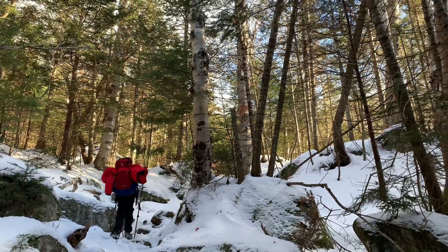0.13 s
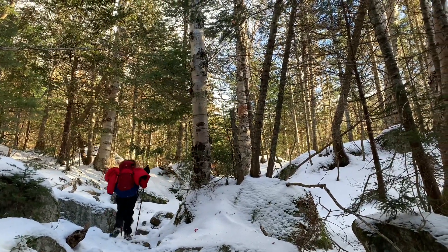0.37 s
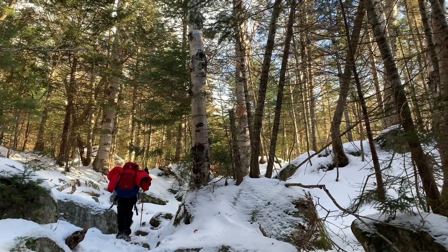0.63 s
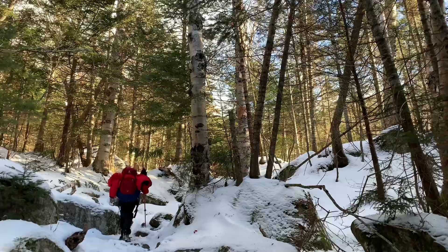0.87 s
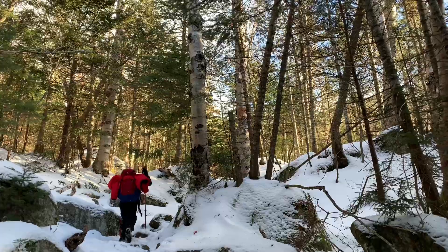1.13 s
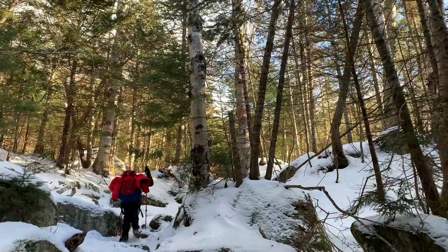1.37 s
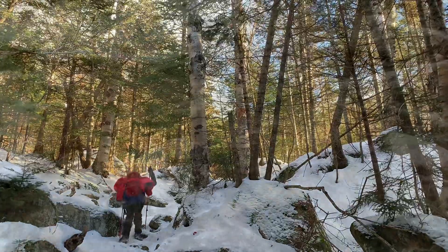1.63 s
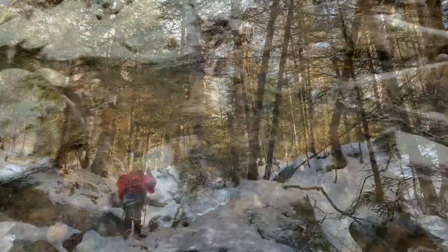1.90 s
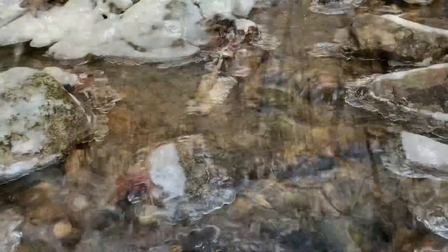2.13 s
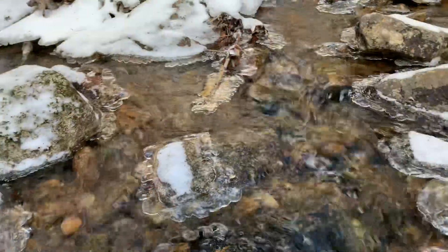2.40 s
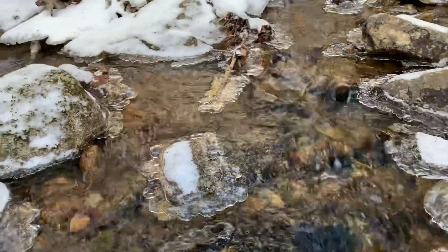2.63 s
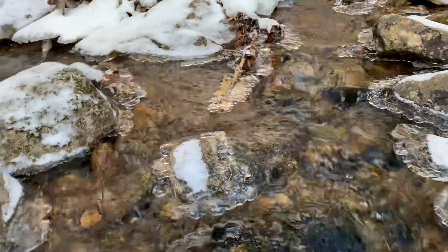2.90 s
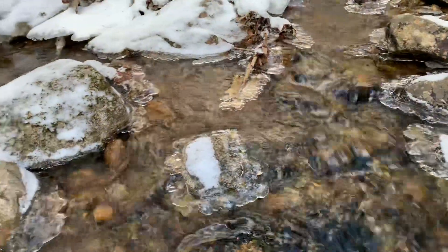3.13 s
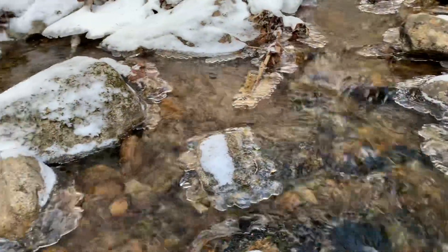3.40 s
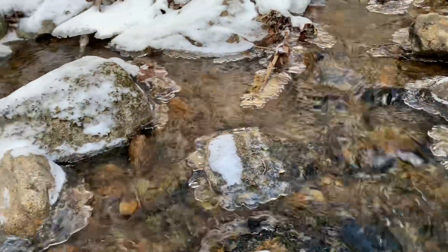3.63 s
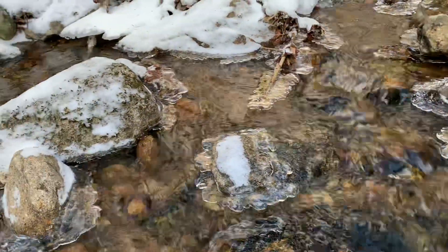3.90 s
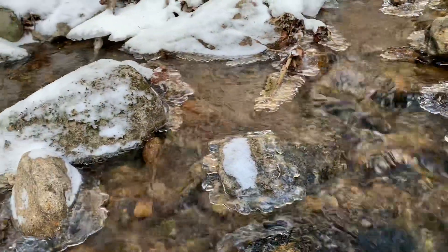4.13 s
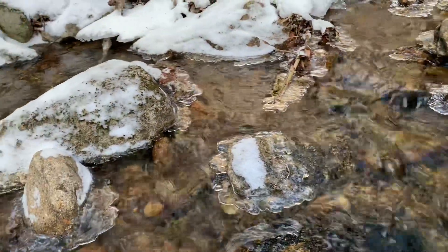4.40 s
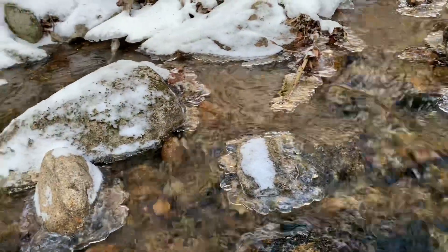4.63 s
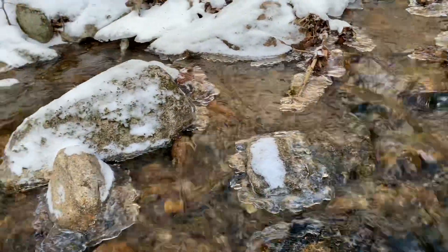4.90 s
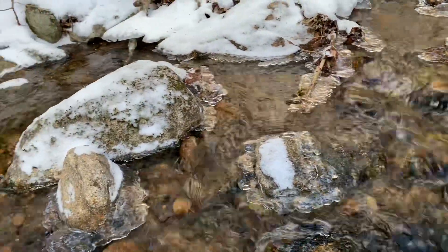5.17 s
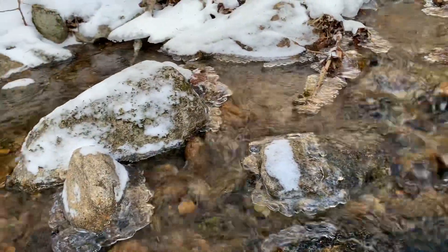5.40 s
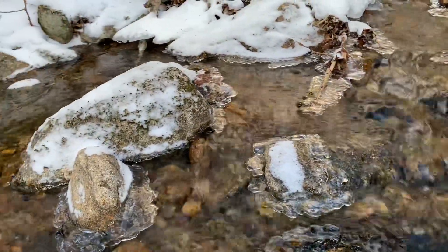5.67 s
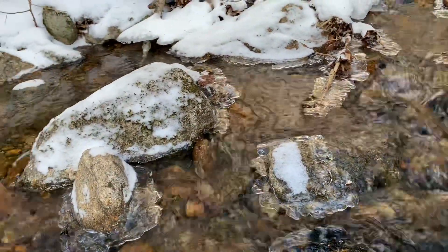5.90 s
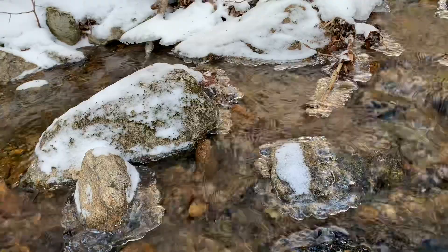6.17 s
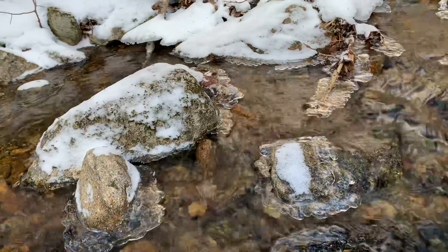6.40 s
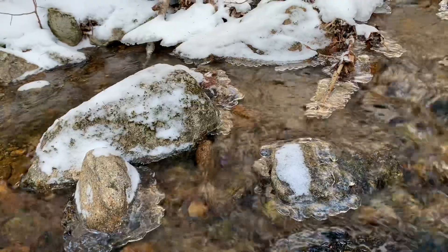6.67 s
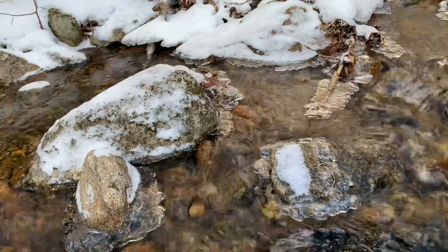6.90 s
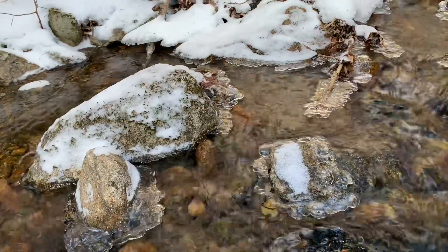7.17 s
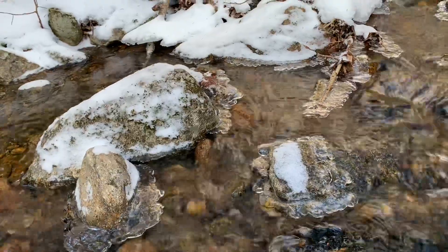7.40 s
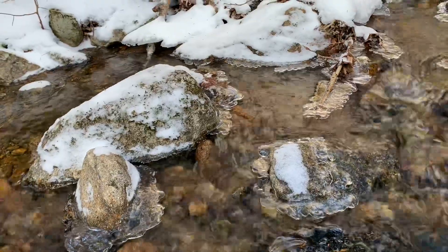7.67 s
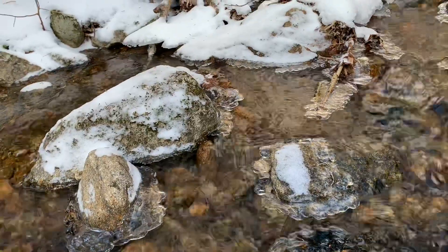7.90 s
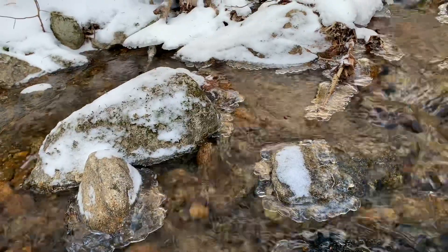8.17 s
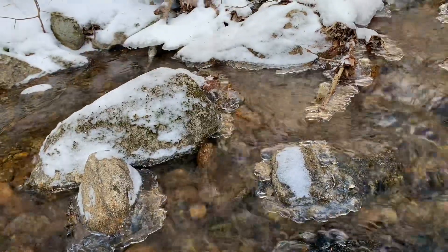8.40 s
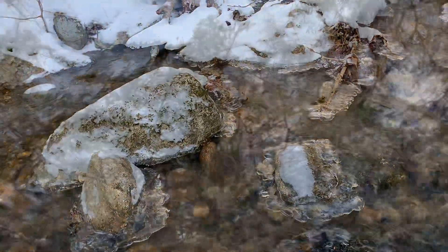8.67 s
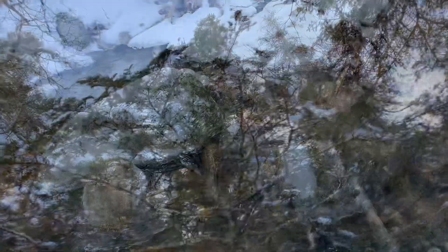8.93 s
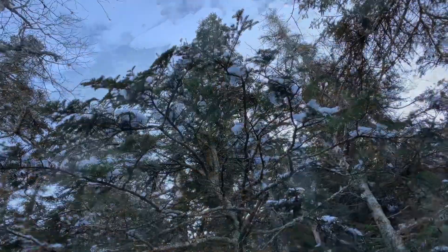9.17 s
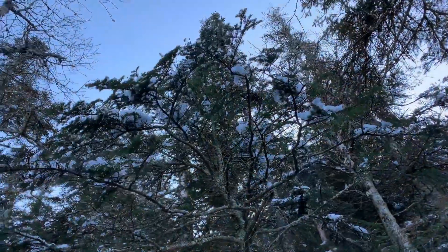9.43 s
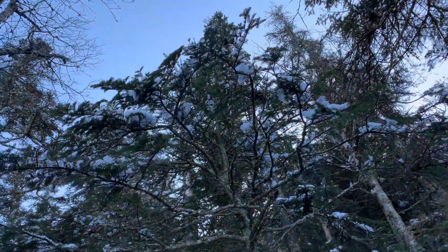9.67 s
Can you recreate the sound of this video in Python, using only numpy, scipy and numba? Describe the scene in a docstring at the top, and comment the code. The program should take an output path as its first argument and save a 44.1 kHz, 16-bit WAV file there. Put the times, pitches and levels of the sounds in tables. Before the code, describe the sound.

A walker softly crunches through snow in a quiet wood, a bubbling stream swells up close, then wind, tree rustle and knocking footsteps end it.

```python
"""In the faint hush of a wood a walker crunches and swishes through snow, packed in noise and breaking grains.
From 1.4 s a shallow brook fades in close by: rushing noise, a hollow hum and thousands of damped sines that
gurgle and fizz; single bubbles pop as rising sines and bursting drops spit as short hisses.
From 8.2 s it fades out under low wind rumble and rustling trees, with two more steps and knocks at the end.
Two microphone ports a few centimetres apart hear it all, with a phase gap and partly unlike noise."""
import sys
import numpy as np
from scipy import signal
from scipy.fft import rfft, irfft, next_fast_len
from scipy.io import wavfile
from scipy.ndimage import map_coordinates
from numba import njit

SR = 44100
rng = np.random.default_rng(int(sys.argv[2]) if len(sys.argv) > 2 else 0)


def attenuation_scalar(level_db):
    """Turn a level in dB into a linear amplitude multiplier (20 dB per decade)."""
    decades = np.asarray(level_db, float) / 20
    return 10 ** decades


def digitize_waveform(pressure):
    """Quantize a signal to 16-bit integers and store it at the path in sys.argv[1].

    Rows of a 2-D input are taken as channels; values are limited to [-1, 1].
    """
    field = np.atleast_2d(pressure).T
    bounded = np.clip(field, -1, 1)
    quanta = np.round(bounded * 32767).astype(np.int16)
    wavfile.write(sys.argv[1], SR, quanta)


N = 432114  # samples, 9.8 s


def unit(x):
    """Scaled to rms 1."""
    return x / np.sqrt(np.mean(x ** 2) + 1e-20)


def along(points, hz):
    """Interpolates (Hz, value) points on a log frequency axis."""
    f, v = np.transpose(points)
    return np.interp(np.log(hz + 1), np.log(f + 1), v)


def wobble(rate):
    """A smooth random curve with rate knots a second."""
    knots = rng.standard_normal(int(N * rate / SR) + 4)
    return map_coordinates(knots, [np.arange(N) * rate / SR])


def fade(start, end):
    """A gain that climbs from 0 to 1 between two times in seconds."""
    return np.clip((np.arange(N) / SR - start) / (end - start), 0, 1)


def bell(s, rise, fall):
    """A smooth swell to 1 at time s; rise and fall are the seconds to 1/e on either side."""
    t = np.arange(N) / SR - s
    return np.exp(-(t / np.where(t < 0, rise, fall)) ** 2)


def filtered(x, response):
    """x times a complex response of frequency."""
    m = next_fast_len(N + 8192)
    return irfft(rfft(x, m) * response(np.fft.rfftfreq(m, 1 / SR)), m)[..., :N]


def noise(colour):
    """Two unrelated coloured noises of rms 1."""
    white = rng.standard_normal((2, N))
    return unit(filtered(white, lambda hz: attenuation_scalar(along(colour, hz))))


@njit
def add(out, s, hz, cycles, gain, rise, swell, sr):
    """Damped sines that swell softly while their pitch glides by rise; cycles are counted per decay to 1/e."""
    for k in range(len(s)):
        life = cycles[k] / hz[k] * sr
        start = int(s[k] * sr)
        for i in range(min(int(5 * life), len(out) - start)):
            u = i / life
            turn = 2 * np.pi * cycles[k] * (u + rise[k] * u * u / 2)
            out[start + i] += gain[k] * np.exp(-u) * (1 - np.exp(-u / swell)) * np.sin(turn)


def rings(s, hz, cycles, gain, rise, swell):
    """A track of damped sines."""
    out = np.zeros(N)
    add(out, s, hz, cycles + 0 * s, gain, rise + 0 * s, swell, SR)
    return out


def froth(colour, count, cycles, spread_db, rise, surge):
    """Countless small rings, born more densely in each surge, some stronger, longer or gliding further."""
    when, size, luck, life, glide = rng.random((count, 5)).T
    births = np.cumsum(surge)
    s = np.searchsorted(births, when * births[-1]) / SR
    hz = colour[0][0] * (colour[-1][0] / colour[0][0]) ** size
    gain = attenuation_scalar(along(colour, hz) - spread_db * np.log(luck + 0.0092)) * hz / 1000
    return rings(s, hz, cycles * (0.56 + life), gain, 2 * glide * rise, swell=0.2)


def froth_pair(*args, **settings):
    """Two unrelated froths of rms 1 that share their surges."""
    return unit(np.array([froth(*args, **settings) for _ in range(2)]))


# Phase gap between the two ports. Each row: frequency in Hz, lead of the left port in radians.
PORT_LEAD = [(0, 0), (500, .2), (1000, .9), (1700, 2.5), (2900, 3.2), (4200, 6.2), (6100, 6.28),
             (16000, -6.55)]


def lead(hz):
    """Half of the phase gap on each port."""
    return np.exp(np.multiply.outer([.5j, -.5j], np.interp(hz, *np.transpose(PORT_LEAD))))


# Likeness of the ports in fully diffuse sound. Each row: frequency in Hz, share of power that both hear.
PORT_SHARED = [(60, 0.77), (200, 0.96), (500, 0.82), (1000, 0.73), (2000, 0.19), (5500, 0.03), (7000, 1),
               (16000, 0.89)]


def ports(pair, diffuse=1):
    """The first track reaches both ports alike, the second is scattered sound of opposite sign; then the phase gap."""
    def mix(hz):
        apart = np.clip(diffuse * (1 - along(PORT_SHARED, hz)) / 2, 0, .5)
        return np.sqrt([1 - apart, apart])
    near, scattered = filtered(pair, mix)
    return filtered(np.array([near + scattered, near - scattered]), lead)


def hush():
    """The faint steady background of the wood, as broad noise."""
    colour = [(20, -21), (45, 4), (100, -2.5), (1000, -8.5), (3500, -13.5), (16000, -18.5)]
    return ports(attenuation_scalar(-74.5) * noise(colour))


# Sudden moves in the snow. Each row: peak in seconds, swish in dB, crunch in dB, fall in seconds.
STAMP_MOVES = [(.097, -57, -101, 0.053), (.755, -80, -63, 0.0082), (0.902, -52.5, -66, 0.037),
               (9.172, -40, -42, 0.017), (9.443, -53.5, -60, 0.086), (9.726, -52, -44.5, 0.035)]
STAMP_RISE_S = 0.0052
# Dragged moves that swell and fade alike. Each row: middle in seconds, swish in dB, crunch in dB,
# half length in seconds.
DRAG_MOVES = [(0.151, -56.5, -72, 0.032), (0.188, -72, -59.5, 0.08), (0.429, -58, -91, 0.05),
              (0.556, -62.5, -70.5, 0.045), (0.833, -64, -67.5, 0.053), (0.973, -71, -66, 0.052),
              (1.253, -62.5, -72.5, 0.098), (1.459, -50.5, -58, 0.028), (9.222, -54, -46.5, 0.026),
              (9.707, -61.5, -68, 0.022), (9.79, -54.5, -54, 0.027)]
# Colour of packing snow. Each row: frequency in Hz, relative level per hertz in dB.
SNOW_COLOUR = [(30, -45), (70, -7.5), (400, -14.5), (1100, -20), (2400, -25.5), (3250, -57), (5500, -120)]
# Colour of swishing clothes. Each row: frequency in Hz, relative level per hertz in dB.
CLOTH_COLOUR = [(1500, -5), (3000, 2.5), (5000, -1), (8000, 3), (11500, 4), (16000, 2.5)]
# Blows close to the microphone. Each row: start in seconds, strength in dB, starting pitch in Hz,
# cycles per decay to 1/e.
MIC_KNOCKS = [(.579, -57, 1260, 4), (1.463, -29, 144, 1.1), (9.171, -25, 510, 1.8), (9.18, -23, 520, 1.1),
              (9.724, -26.5, 85, 1.6), (9.729, -29.5, 497, 2.8), (9.75, -31, 806, 1.2)]


def walker():
    """Each move swells and fades: snow packs down and breaks in grains, clothes swish, knocks reach the microphone."""
    strokes = [bell(s, STAMP_RISE_S, fall) for s, _, _, fall in STAMP_MOVES]
    strokes += [bell(s, half, half) for s, _, _, half in DRAG_MOVES]
    swish, crunch = attenuation_scalar(np.array(STAMP_MOVES + DRAG_MOVES)[:, 1:3]).T @ np.array(strokes)
    crumble = attenuation_scalar(5 * wobble(50))  # the crust gives way in lumps
    grains = froth_pair([(250, -3), (2500, -17)], count=9000, cycles=0.9, spread_db=5.5, rise=0,
                        surge=crumble)
    snow = crunch * unit(crumble * noise(SNOW_COLOUR) + attenuation_scalar(-3) * grains)
    cloth = swish * unit(attenuation_scalar(3.1 * wobble(150)) * noise(CLOTH_COLOUR))
    s, db, hz, cycles = np.transpose(MIC_KNOCKS)
    knock = rings(s, hz, cycles, attenuation_scalar(db), rise=-0.025, swell=0.33)  # alike on both ports
    return ports(snow + cloth, diffuse=0.39) + knock


# Colour of the fizzing bubbles. Each row: pitch in Hz, relative level per hertz in dB.
FROTH_COLOUR = [(150, -11.5), (250, -9), (380, -1), (600, -10), (1000, -6), (1600, -12), (3000, -20),
                (6000, -29.5)]
# Colour of the longer gurgles. Each row: pitch in Hz, relative level per hertz in dB.
GURGLE_COLOUR = [(290, -5), (390, 1), (680, -12), (1000, -4), (1350, -16.5), (2000, -16)]


def bubbles(surge_db):
    """Trapped air rings in many short bubbles; fewer ring longer, loudest near two pitches: the gurgle."""
    fizz = froth_pair(FROTH_COLOUR, count=26000, cycles=5.16, spread_db=2.5, rise=0.014,
                      surge=attenuation_scalar(1.6 * surge_db))
    gurgle = froth_pair(GURGLE_COLOUR, count=1200, cycles=7.07, spread_db=2.5, rise=0.045,
                        surge=attenuation_scalar(2.2 * surge_db))
    return attenuation_scalar(-1.5) * fizz + attenuation_scalar(-1.5) * gurgle


# Colour of falling droplets. Each row: pitch in Hz, relative level per hertz in dB.
DRIP_COLOUR = [(1500, -13), (2300, 2.5), (3200, -1.5), (5000, -7.5)]


def droplets():
    """Droplets fall back in small clusters and ring briefly over a rough trickle of noise."""
    cluster_db = 4.5 * wobble(7) + 4.5 * wobble(25)
    drips = froth_pair(DRIP_COLOUR, count=1200, cycles=6, spread_db=2.2, rise=0.03, surge=attenuation_scalar(cluster_db))
    trickle = unit(attenuation_scalar(0.96 * cluster_db) * noise(DRIP_COLOUR))
    return attenuation_scalar(-12.5) * drips + attenuation_scalar(-15) * trickle


# Colour of fine spray, for its ticks and for bursting drops.
# Each row: frequency in Hz, relative level per hertz in dB.
SPRAY_COLOUR = [(1800, -45), (4000, -7.5), (7000, 9.5), (11000, 5.5), (16000, -6)]


def spray(surge_db):
    """Fine spray patters in bursts of tiny sharp ticks, with bursts of its own on each track."""
    ticks = [froth(SPRAY_COLOUR[1:], count=9000, cycles=6.4, spread_db=3.5, rise=0.0074,
                   surge=attenuation_scalar(7 * wobble(60) + 1.9 * surge_db)) for _ in range(2)]
    return attenuation_scalar(-15.5) * unit(np.array(ticks))


def air_pocket():
    """The hollow hum of an air pocket: a narrow band of noise near 200 Hz that wavers in level."""
    colour = [(150, -47.0), (190, -1.0), (210, 1.5), (232, -4.0), (290, -36.0)]
    return attenuation_scalar(-5.0 + 3.3 * wobble(18)) * noise(colour)


# Colour of the rushing water. Each row: frequency in Hz, relative level per hertz in dB.
RUSH_COLOUR = [(30, -54), (50, -6.5), (149, -3.5), (200, -14), (270, -14), (344, 1), (659, -5),
               (1100, -5.5), (6560, -20), (8830, -21), (11000, -24), (16000, -48)]
# Side on which the brook lies. Each row: frequency in Hz, left over right in dB.
BROOK_SIDE = [(200, -0.5), (1000, 1.5), (2500, 0.5), (5000, -1.8), (9000, 0)]
# gain on the layers in dB; fades in and out as (start, end) in seconds; power that bends the fades
FLOW_DB, FLOW_IN, FLOW_OUT, FLOW_BEND = -42, (1.374, 2.36), (8.19, 9.35), 0.95


def brook():
    """Close water: rush, bubbles and spray surge together, with droplets and hum; all fade in and out as one."""
    surge_db = 0.6 * wobble(5) + 1.4 * wobble(17)
    rush = attenuation_scalar(-7.5 + 1.67 * surge_db) * noise(RUSH_COLOUR)
    ringing = filtered(bubbles(surge_db) + droplets(), lambda hz: hz > 45)  # keeps them free of low rumble
    water = ports(rush + ringing + spray(surge_db) + air_pocket())

    def side(hz):
        return attenuation_scalar(np.multiply.outer([.5, -.5], along(BROOK_SIDE, hz)))
    nearness = (fade(*FLOW_IN) - fade(*FLOW_OUT)) ** FLOW_BEND
    return attenuation_scalar(FLOW_DB) * nearness * filtered(water, side)


# The loudest single bubbles. Each row: start in seconds, envelope peak in dB before panning,
# starting pitch in Hz.
PLOP_BUBBLES = [(2.155, -37, 2130), (2.1815, -35.5, 2000), (2.7, -32.5, 514), (2.937, -33, 474),
                (1.655, -37, 356), (5.499, -33, 960), (6.5855, -38, 2980), (6.8875, -34, 4200),
                (4.243, -31, 308), (4.519, -31.5, 330), (2.2163, -35, 2160), (2.235, -34.5, 576),
                (2.284, -34, 2400), (2.671, -34, 3060), (2.721, -36, 2200), (2.7505, -36, 2770),
                (2.814, -28.5, 886), (2.87, -30, 390), (3.01, -29, 370), (3.059, -29, 430),
                (3.309, -29.5, 1010), (3.604, -31.5, 1004), (3.658, -26.5, 379), (3.942, -35, 2220),
                (4.051, -29.5, 975), (4.07, -28, 393), (4.116, -33.5, 4400), (4.2005, -34, 2360),
                (4.465, -29, 430), (4.609, -30, 352), (4.998, -31.5, 362), (5.127, -34, 830),
                (5.5, -25, 327), (5.601, -35, 690), (5.664, -30.5, 784), (5.859, -30.5, 1020),
                (6.549, -33.5, 934), (6.72, -28.5, 1075), (6.887, -30, 378), (6.995, -29.5, 970),
                (7.195, -30.5, 403), (7.374, -30, 1082), (7.584, -29, 980), (8.277, -30, 976),
                (8.346, -33, 2680), (8.353, -36.5, 3700), (8.448, -30.5, 460), (8.668, -32.5, 432)]
SMALL_HZ = 1500  # bubbles from this pitch up come from falling drops


def plops():
    """Single bubbles climb in pitch as they die: middle-sized ones left of the ports, drop-struck ones ahead."""
    s, db, hz = np.transpose(PLOP_BUBBLES)
    pan_db = along([(400, 1.2), (900, 3.3), (2500, .1)], hz)  # left over right
    cycles, swell = along([(300, 2.77), (1000, 5.3), (2200, 4)], hz), 0.3
    top = (1 + 1 / swell) ** -swell / (1 + swell)  # highest point of the swelling, dying envelope

    def track(some):
        return np.array([rings(s, hz, cycles, some * attenuation_scalar(db + side * pan_db) / top, rise=0.03, swell=swell)
                         for side in (.5, -.5)])
    return filtered(track(hz < SMALL_HZ), lead) + track(hz >= SMALL_HZ)  # small ones have no phase gap


# Drops bursting by the ports. Each row: start in seconds, starting level in dB.
SPIT_DROPS = [(2.7273, -39), (2.81, -38), (2.8833, -35.5), (3.036, -40.5), (3.966, -36), (4.5035, -40),
              (4.8293, -40), (5.386, -36.5), (5.772, -38), (5.972, -39), (6.1437, -34.5), (6.443, -36.5),
              (6.884, -27.5), (7.107, -36.5), (8.2104, -27.5), (8.2567, -32.5), (8.556, -37)]
SPIT_T60_S = 0.019  # time to fall by 60 dB


def spits():
    """A drop bursts: a sharp hiss of spray that dies in milliseconds."""
    shape, t = np.zeros(N + SR), np.arange(SR // 10) / SR
    for s, db in SPIT_DROPS:
        shape[round(s * SR):][:len(t)] += attenuation_scalar(db - 60 * t / SPIT_T60_S)
    return ports(shape[:N] * noise(SPRAY_COLOUR))


# Colour of wind rumble at the ports. Each row: frequency in Hz, relative level per hertz in dB.
RUMBLE_COLOUR = [(12, -50), (20, -15), (43, -5), (64, -0.5), (172, -25.5), (390, -47.5), (660, -120)]
# Short gusts. Each row: middle in seconds, level in dB, half length in seconds.
WIND_GUSTS = [(8.77, -50, 0.012), (9.275, -43.5, 0.029), (9.635, -50, 0.044), (9.75, -48.5, 0.094)]
WIND_DB, WIND_IN = -54.5, (8.64, 8.69)  # steady wind: strength in dB, rise (start, end) in seconds


def wind():
    """Low eddies buffet the ports in gusts, partly alike on both."""
    near, own = noise(RUMBLE_COLOUR)
    strength = attenuation_scalar(WIND_DB) * fade(*WIND_IN)
    strength = strength + sum(attenuation_scalar(db) * bell(s, half, half) for s, db, half in WIND_GUSTS)
    return strength * np.array([near + 0.9 * own, near - 0.7 * own])


TREES_DB, TREES_IN = -57, (8.7, 9.91)  # level in dB about which it rustles, rise (start, end) in seconds


def trees():
    """Wind in the trees: noise that rustles unevenly as it rises."""
    rustle_db = 2.5 * wobble(12) + 2.5 * wobble(45)
    colour = [(150, -11), (1000, -3), (2200, -10.5), (3100, 0.5), (4200, -11.5), (16000, -23.0)]
    return ports(attenuation_scalar(TREES_DB + rustle_db) * fade(*TREES_IN) * noise(colour))


def scene():
    """Walker, brook and wind over the faint hush of the wood."""
    return hush() + walker() + brook() + plops() + spits() + wind() + trees()


def top_cut(x):
    """Nothing passes above the cut-off."""
    return signal.sosfilt(signal.butter(12, 16960, fs=SR, output="sos"), x)


def record(dry):
    """Low-passes the mix: nothing sounds above about 16 kHz."""
    mix = filtered(dry, lambda hz: hz < 15950)
    return top_cut(mix)


dry = scene()
out = record(dry)
digitize_waveform(out)
```